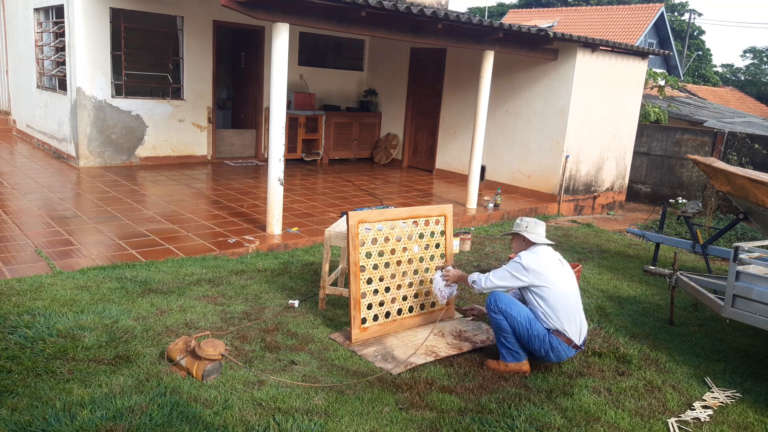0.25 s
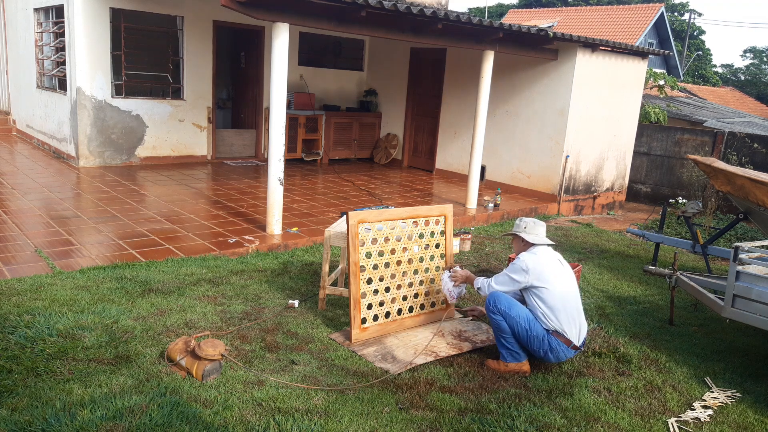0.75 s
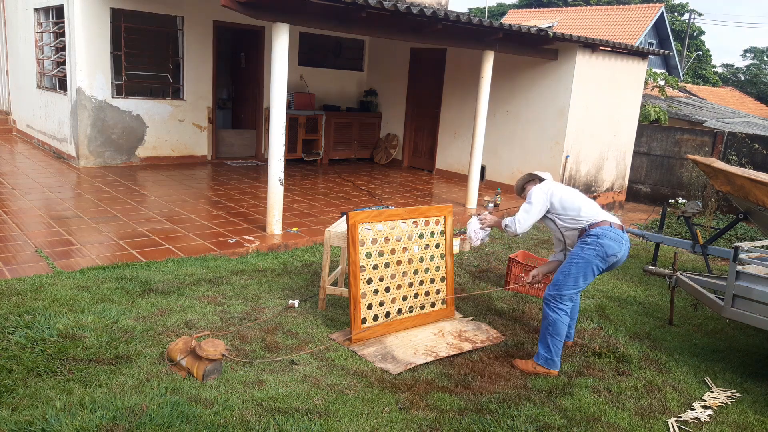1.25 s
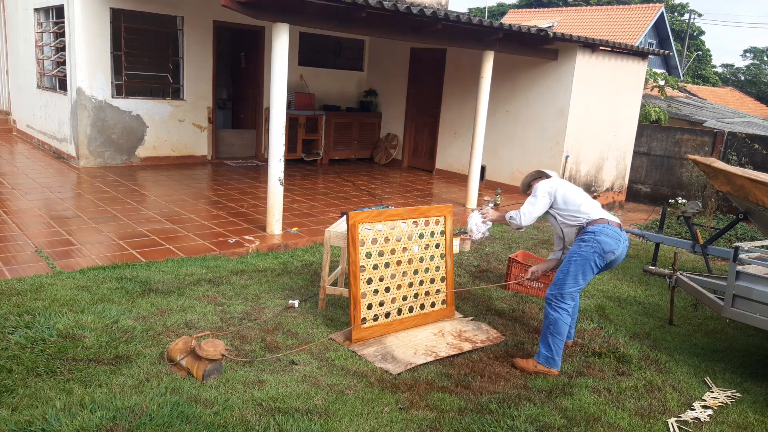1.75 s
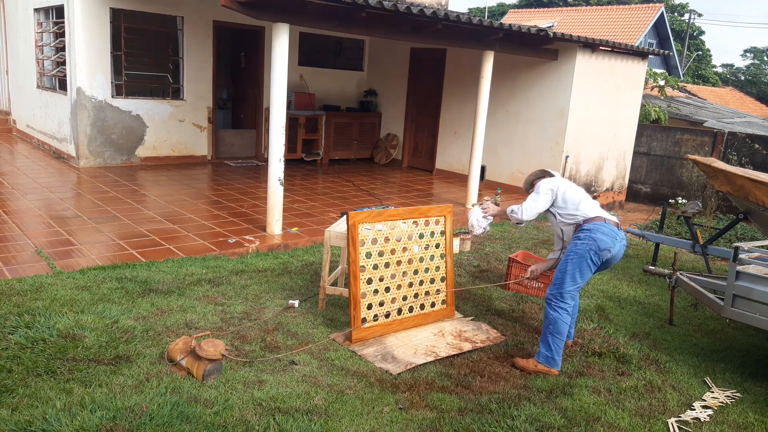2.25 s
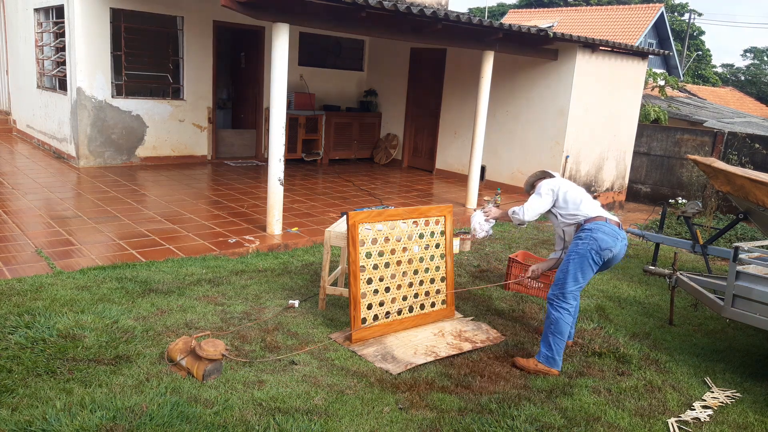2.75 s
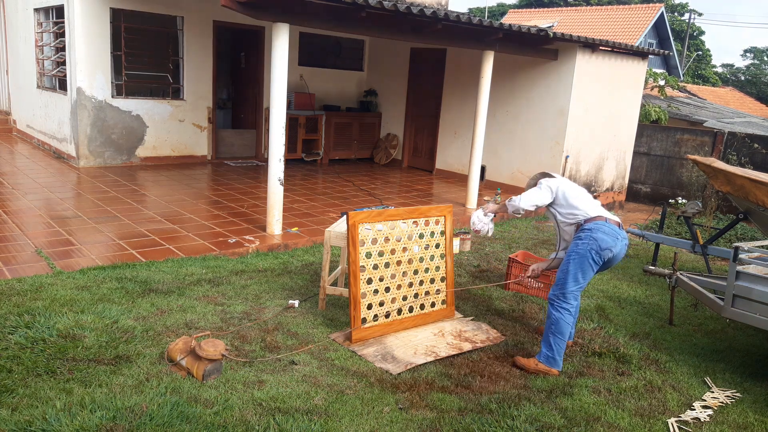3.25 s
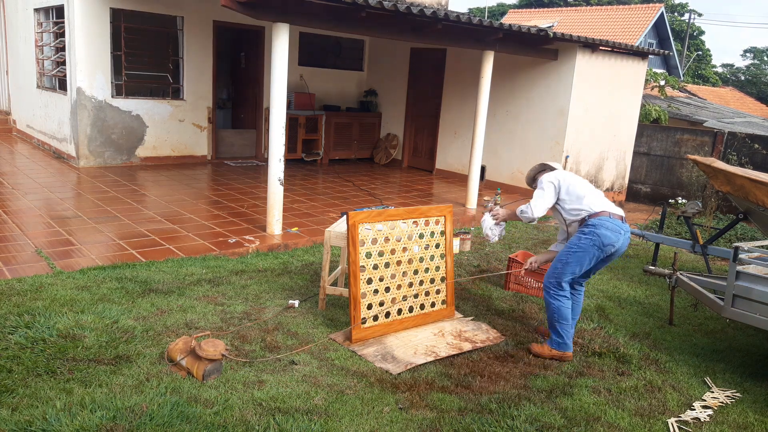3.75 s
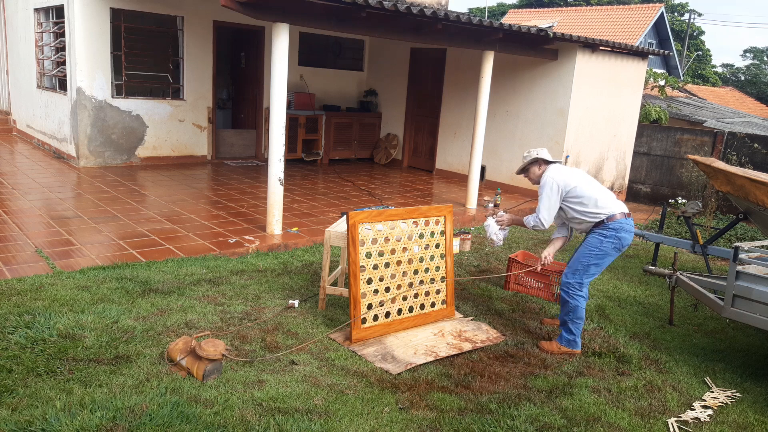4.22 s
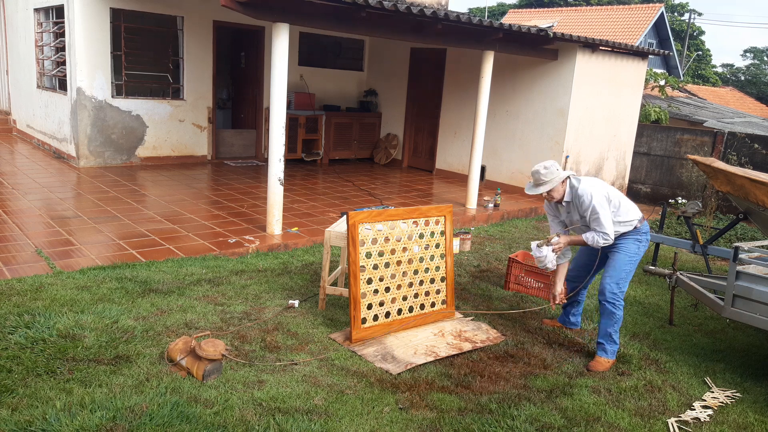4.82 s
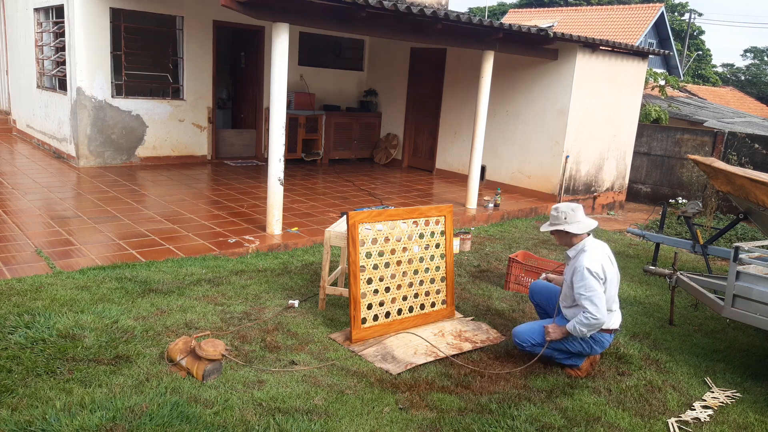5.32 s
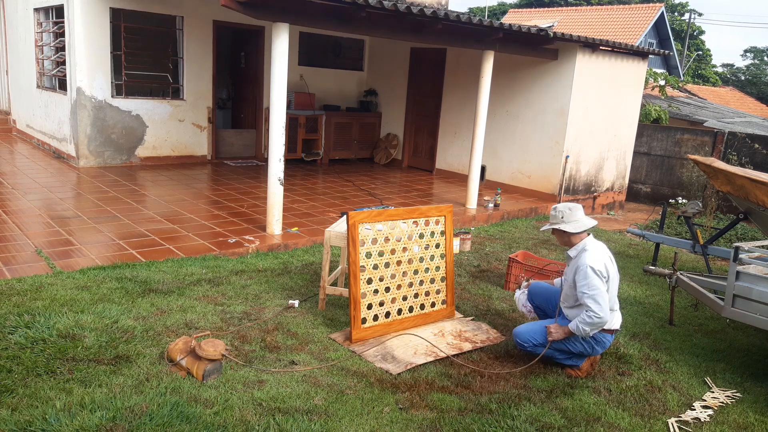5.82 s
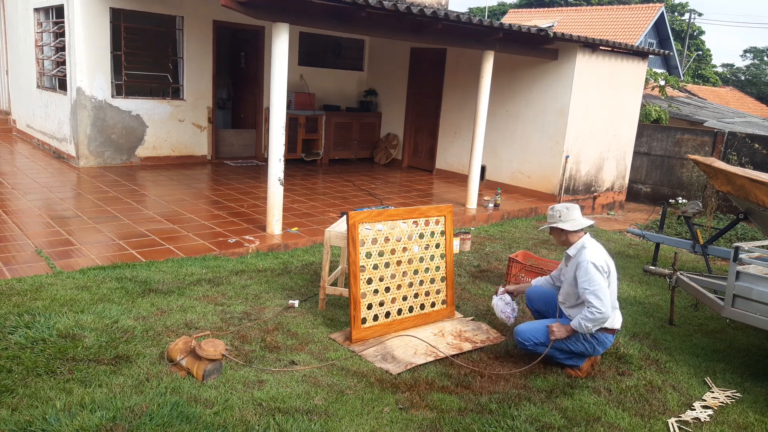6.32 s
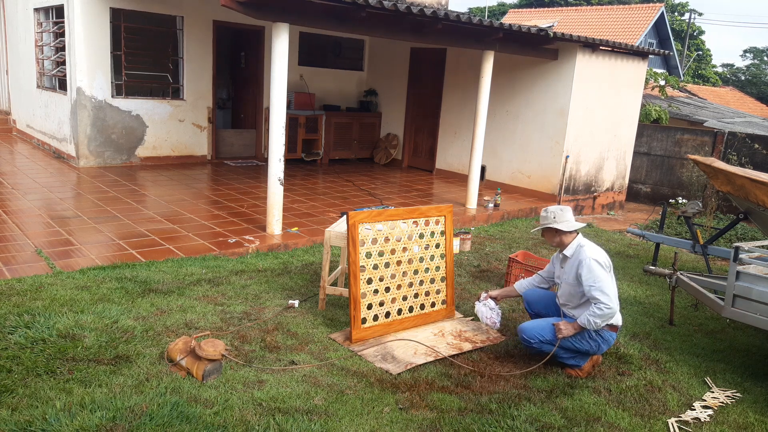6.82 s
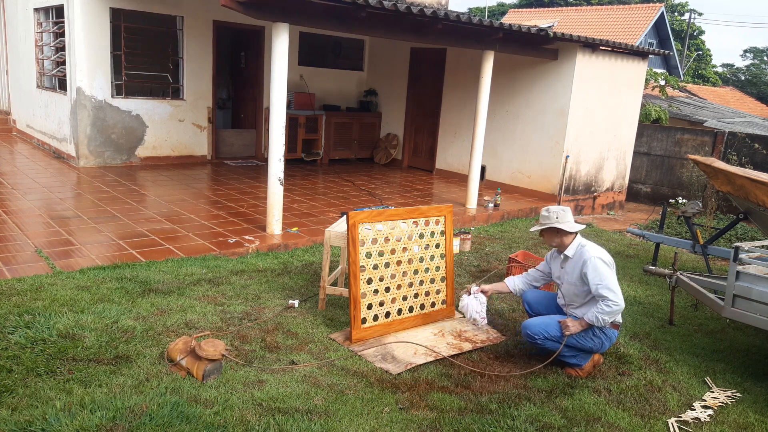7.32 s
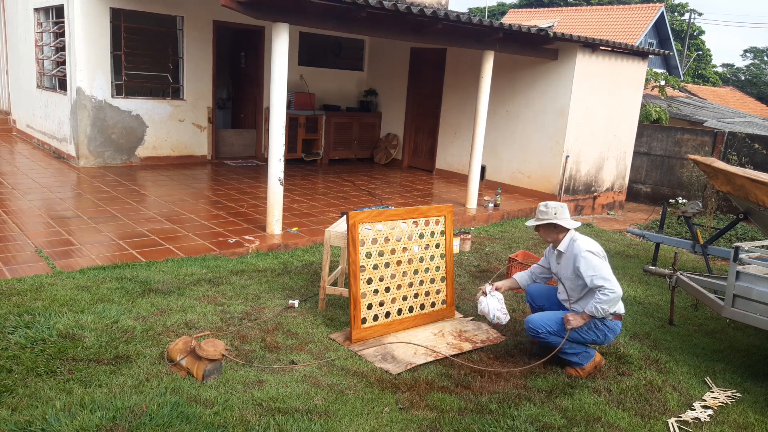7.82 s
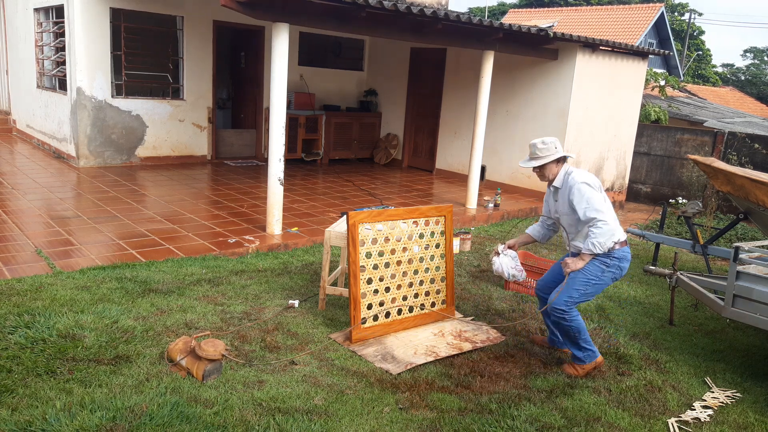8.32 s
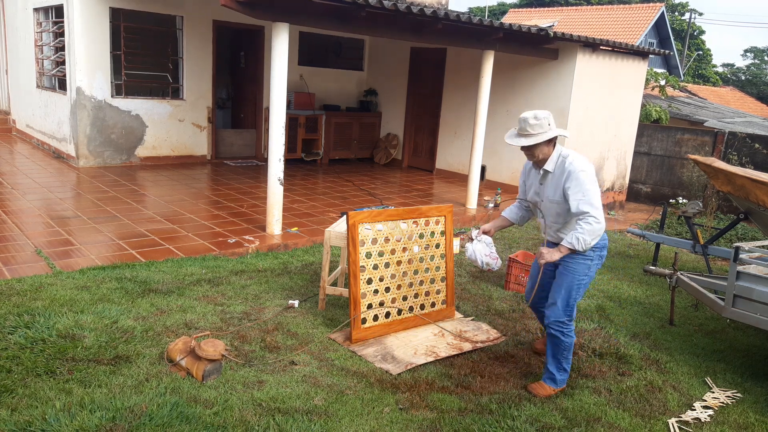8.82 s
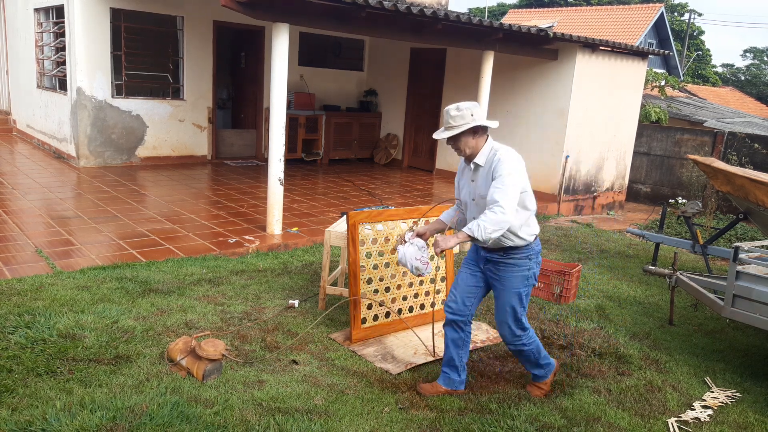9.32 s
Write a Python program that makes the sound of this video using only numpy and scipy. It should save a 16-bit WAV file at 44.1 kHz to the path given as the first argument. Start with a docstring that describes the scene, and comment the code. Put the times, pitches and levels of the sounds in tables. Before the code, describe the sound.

A low, rattling motor drone of about twenty-nine pulses a second runs throughout, with fine airy valve puffs and soft yard noise. Over it, a paint sprayer makes crisp, high hiss in short wrist-swing swells. The hiss cuts to a denser rush, softens, comes back, then stops abruptly, leaving the compressor alone before a final long spray with hollow, shifting colour that recedes. Open-air stereo pickup.

```python
"""A piston compressor chugs on a lawn by a house while a spray gun coats a wooden lattice panel.
First the gun hisses up close, swelling three times. At 0.98 s hiss and chug change abruptly: the hiss is
strong, eases off and returns. At 4.88 s they change again: the gun rests while the compressor chugs on,
then makes one long close pass and is drawn away. The chug is one shaft turn repeated, with puffs of shaped
noise at the valves. The hiss is three coloured noises combed by the panel's echo, which gives a moving,
phasing colour. Steady noise makes the yard."""
import sys
import numpy as np
from scipy import signal
from scipy.fft import rfft, irfft
from scipy.io import wavfile
from scipy.ndimage import uniform_filter1d

SR = 44100
rng = np.random.default_rng(int(sys.argv[2]) if len(sys.argv) > 2 else 0)


def unload_audio(sound):
    """Save the sound as a 16-bit wav file, at the path given as the first command line argument."""
    columns = np.transpose(np.atleast_2d(sound))
    # keep every value between -1 and 1, then stretch to whole-number steps
    steps = np.round(np.clip(columns, -1, 1) * 32767)
    wavfile.write(sys.argv[1], SR, steps.astype(np.int16))


N = 421596  # length in samples, about 9.6 s

SHAFT_HZ = 28.7125  # turns of the compressor's shaft per second
# The three stretches of the sound. Each row: start in seconds, lag of the crank in turns.
STRETCH_STARTS = [(0, .225), (.98, .147), (4.88, 0)]


def gain_of(db):
    """Turn decibels into an amplitude factor."""
    return 10 ** (np.asarray(db) / 20)


def read(points, hz):
    """Read a spectrum whose points are joined by straight lines over log frequency."""
    f, value = np.transpose(points)
    return np.interp(np.log(hz + 1), np.log(f + 1), value)


def follow(rows, t):
    """Read every column of a table at t, its first column being the position."""
    position, *columns = np.transpose(rows)
    return [np.interp(t, position, column) for column in columns]


def stretch_at(t):
    """Number of the stretch that each time belongs to."""
    return np.searchsorted(np.transpose(STRETCH_STARTS)[0], t, "right") - 1


def by_stretch(curves, t):
    """Read every column at the times t, each stretch following its own curve."""
    return np.choose(stretch_at(t), [np.array(follow(rows, t)) for rows in curves])


def drift(hz):
    """Random wandering of unit size, with nothing faster than hz."""
    spectrum = rfft(rng.standard_normal(N))
    slow = irfft(spectrum * (np.fft.rfftfreq(N, 1 / SR) < hz), N)
    return slow / slow.std()


def white(size):
    """Short-time spectra of two unrelated noises of 0 dB per Hz: (Hz, seconds, spectra)."""
    noise = rng.standard_normal((2, N)) * np.sqrt(SR / 2)
    return signal.stft(noise, SR, nperseg=size, noverlap=size - size // 4)


def ports(z, same, left_db, lead):
    """Two noises as left and right microphone ports hear them: partly alike, shifted in level and time."""
    same = np.clip(same, 0, 1)
    left = z[0] * lead * gain_of(left_db / 2)
    right = (same * z[0] + np.sqrt(1 - same ** 2) * z[1]) * gain_of(-left_db / 2)
    return np.array([left, right])


def sound(z):
    """Turn short-time spectra back into a waveform."""
    size = 2 * (z.shape[1] - 1)
    return signal.istft(z, nperseg=size, noverlap=size - size // 4)[1][:, :N]


def toward(hz, lead_ms=0.18):
    """Phase turn that lets a sound reach the left port first."""
    return np.exp(2j * np.pi * hz * lead_ms / 1000)


def crank():
    """Turns of the shaft so far: a steady speed, slightly uneven, with its own lag in each stretch."""
    t = np.arange(N) / SR
    lag = np.transpose(STRETCH_STARTS)[1]
    wobble = .0005 * drift(10)  # in turns
    return SHAFT_HZ * t - lag[stretch_at(t)] + wobble


def compressor(turns, scatter=0.33, count=90, size=4096):
    """Piston and valve knocks time the shaft's harmonics; housing and walls set how strong each one is."""
    # Pressure swells in each turn. Each row: place in the turn (0-1), ring in Hz, width in Hz,
    # weight in dB against the other knocks, direction (1 push, -1 suck).
    knock_rows = [(0.316, 660, 302, -4.5, 1), (0.523, 350, 252, 0, 1), (0.597, 361, 172, 3, 1),
                  (0.629, 412, 250, -13.5, -1), (0.785, 560, 378, -7.5, 1), (0.844, 770, 316, 0, -1),
                  (0.867, 424, 380, -8, 1), (0.942, 108, 127, 9, -1), (0.022, 412, 340, 1, -1),
                  (0.071, 218, 257, 5, 1), (0.104, 755, 285, -11, -1)]
    # Strength of the shaft's harmonics as housing and wall echoes pass them.
    # Each row: multiple of the shaft speed, relative level in dB, left minus right in dB.
    hum = [(1, -36.0, 0), (2, -12.5, -3), (3, -14.0, -4), (4, -5.0, -3), (5, -20.0, -3), (6, -7.0, -3),
           (7, -22.0, -3), (8, -13.0, -3), (9, -10.5, -4), (10, -2.5, 0), (11, 0.0, -3), (12, -8.0, 2),
           (13, -12.5, -6), (14, -23.5, -3), (15, -3.0, -4), (16, -13.5, -1), (17, -11.0, -1),
           (18, -19.5, -8), (19, -20.0, -3), (20, -31.0, -2), (21, -11.0, -6), (22, -16.5, -5),
           (23, -7.0, -1), (24, -7.0, -6), (25, -15.0, 7), (26, -22.0, -5), (27, -12.0, -2), (28, -9.5, -4),
           (29, -11.5, -3), (30, -24.5, 1), (31, -19.0, -5), (32, -19.0, -12), (33, -19.5, -3),
           (34, -18.5, 5), (35, -21.0, -2), (36, -27.0, -5), (37, -29.0, 9), (38, -21.5, 5),
           (39, -26.0, -8), (40, -31.0, 1), (41, -35.0, -6), (42, -28.0, 2), (43, -35.5, 5),
           (44, -30.0, -7), (45, -26.5, -4), (46, -29.0, -1)]
    # Faint buzz of the housing above those harmonics. Each row: frequency in Hz, relative level in dB.
    buzz = [(1350, -37), (1500, -53), (1610, -29), (1780, -82), (1910, -28.5), (2100, -49), (2600, -37)]
    # Loudness, with a brief dip at the second abrupt change. Each row: time in seconds, level in dB.
    load = [(0, -31.5), (4.86, -31), (4.88, -35), (4.9, -30), (6, -28.6), (7.5, -30), (8.6, -29.5),
            (9.5, -27.5)]
    order = np.arange(1, count + 1)
    hz = order * SHAFT_HZ
    knocks = 0
    for place, ring, width, db, way in knock_rows:
        response = 1 / (1 + ((hz - ring) / width) ** 2 / 2) ** 2
        knocks = knocks + np.sign(way) * gain_of(db) * np.exp(-2j * np.pi * order * place) * response
    hum_db, left_db = follow(hum, order)
    strength = gain_of(np.where(order <= len(hum), hum_db, read(buzz, hz)))
    # only the timing of the knocks is kept, not their strength
    harmonics = strength * knocks / abs(knocks)
    # the sound reaches the left port first; wall echoes stir the timing of the higher harmonics
    stir = scatter * np.minimum(hz / 800, 2) * rng.standard_normal(count) / 2
    apart = toward(np.minimum(hz, 1300) / 2) * np.exp(1j * stir) * gain_of(left_db / 2)
    pair = harmonics * np.array([apart, 1 / apart]) / np.maximum(abs(apart + 1 / apart), 1)
    # one turn as a waveform, its left-right mean scaled to unit size
    cycle = irfft(np.pad(pair, ((0, 0), (1, 0))), size)
    cycle /= cycle.mean(0).std()
    place_in_cycle = np.arange(size) / size
    chug = np.array([np.interp(turns, place_in_cycle, side, period=1) for side in cycle])
    flutter_db = .2 * drift(20)
    return chug * gain_of(follow(load, np.arange(N) / SR)[0] + flutter_db)


def valves(turns):
    """Short puffs of air at fixed places in each turn, and a thin steady whistle of the airflow."""
    # Puffs at the valves. Each row: place in the turn (0-1), spread in turns, gain in dB.
    puffs = [(.03, .014, 6), (.08, .028, 0), (.2, .015, -3), (.245, .012, -3), (.42, .022, -4),
             (.85, .08, -13)]
    # Colour of the air before the puffs' gain. Each row: frequency in Hz, level in dB per Hz.
    air_colour = [(600, -97), (1500, -85), (2700, -89), (3400, -87), (4200, -79), (5300, -80), (6300, -79),
                  (8000, -88), (16000, -96)]
    whistle_hz, whistle_width_hz, whistle_gain_db = 5020, 40, 5
    hz, t, z = white(size=512)
    hz = hz[:, None]
    pair = ports(z, same=0.088, left_db=-4.0, lead=toward(np.minimum(hz, 600)))
    air = sound(pair * gain_of(read(air_colour, hz)))
    power = 0
    for place, spread, db in puffs:
        distance = (turns - place + .5) % 1 - .5  # in turns, the short way round
        power = power + gain_of(db) ** 2 * np.exp(-(distance / spread) ** 2)
    # the whistle is a narrow band of the same air
    whistle = signal.lfilter(*signal.iirpeak(whistle_hz, whistle_hz / whistle_width_hz, SR), air)
    return air * np.sqrt(power) + gain_of(whistle_gain_db) * whistle


def spray_gun(same=0.52, patchy_db=1.8, sputter_db=0.26, mirror_hz=2500):
    """Nozzle fizz, the jet's rush on the wood and a hollow roar, all combed by the panel's echo."""
    # Slow course of the jet, one curve per stretch. Each row: time in seconds, nozzle fizz in dB,
    # rush and roar together in dB, roar against rush in dB, lag of the left port in ms.
    jet = [
        [(0, -32.5, -38, -6, .002)],
        [(1, -37, -34, -9.5, .025), (3.19, -36, -34, -11, .028), (3.26, -35.5, -39, -7.5, 0.03),
         (4.3, -35.5, -39, -6.5, 0.033), (4.48, -31, -34, -14, 0.016), (4.87, -36, -41.5, -8, 0.014)],
        [(5.48, -47, -61, -12, .002), (5.7, -40, -46.5, -10, .002), (5.9, -37, -42.5, -4, .002),
         (5.97, -27.5, -35.5, 0.5, .002), (6.5, -30.5, -35.5, 1, .002), (7.2, -28.5, -37.5, -3, .002),
         (7.34, -36, -35, -5, .002), (7.39, -35.5, -44, -12, 0.048), (8.55, -42, -47.5, -5, 0.038),
         (9.5, -44, -48, -6, .013)],
    ]
    # Echo between gun and panel as the hand moves, one curve per stretch.
    # Each row: time in seconds, delay in ms, strength in the treble (0-1).
    panel_echo = [
        [(0, .755, 0.2), (.6, 0.7, 0.2), (.97, 0.657, 0.4)],
        [(4.4, 1.2, .03), (4.6, 1, .33), (4.87, 0.87, .36)],
        [(5.6, .37, 0.1), (5.82, 0.24, .3), (6.02, 0.16, 0.4), (6.5, 0.17, 0.47), (6.88, 0.13, 0.35),
         (7.2, 0.18, 0.44), (7.5, 0.37, 0), (7.72, .29, .32), (7.9, .24, .32), (8.2, .36, 0)],
    ]
    # Colours of the three noises. Each row: frequency in Hz, relative level in dB.
    # The fizz is then moved in pitch and narrowed.
    fizz_colour = [(5000, -52), (8200, -8.5), (9300, -7), (10500, -4), (11500, -1.5), (12600, 0),
                   (14200, -1), (16000, -4)]
    rush_colour = [(900, -6.5), (2000, -8.5), (2900, -3.5), (3700, -5.5), (4300, -2.5), (5500, 1),
                   (6400, 2), (7300, 3), (7950, 4), (8400, 0.5), (10000, -6.5), (14000, -33)]
    roar_colour = [(500, -24), (1150, -9), (1500, 0.5), (2000, 0.5), (2500, -9), (4500, 0), (6300, -18),
                   (6800, -1.5), (7100, 5.5), (7500, -2), (8000, -29), (12000, -40)]
    # The fizz sounds higher or lower as the jet turns on the wood. Each row: time in seconds, pitch factor.
    fizz_pitch = [(.9, 0.97), (1.1, 0.98), (6.05, .96), (6.5, .99), (6.7, 0.96), (7, 1.01), (7.25, 0.97),
                  (7.55, 0.96), (7.85, 0.99), (8.1, 0.9), (8.5, 1.05), (9.5, 0.96)]
    # Balance of the gun. Each row: frequency in Hz, left minus right in dB.
    gun_side = [(1300, -5), (4400, -1.5), (7200, -4.5), (8300, 2.5), (9500, 4), (12000, -1), (16000, 0.5)]
    fizz_narrowing = 1  # how much the fizz gathers around its peak as the roar takes over
    hz, t, z = white(size=512)
    hz = hz[:, None]
    fizz_db, rush_db, roar_db, lag_ms = by_stretch(jet, t)
    fizz_db, rush_db = swings(t) + [fizz_db, rush_db]
    delay_ms, echo = by_stretch(panel_echo, t)
    phase_per_ms = -2j * np.pi * hz / 1000
    # sound bounces to and fro; the narrow slats mirror mostly the treble
    bounce = echo * hz / (hz + mirror_hz)
    comb = 1 / abs(1 - bounce * np.exp(phase_per_ms * delay_ms)) ** 2
    late = np.exp(phase_per_ms * lag_ms)
    common = (1 + same * late.real) / 2  # share of the power common to both ports
    # rush and roar share the jet's power
    plain_db = rush_db - 10 * np.log10(1 + gain_of(roar_db) ** 2)
    roar_share = 1 - gain_of(plain_db - rush_db) ** 2
    pitched_fizz_db = read(fizz_colour, hz / follow(fizz_pitch, t)[0])
    layers = [(pitched_fizz_db * (1 + fizz_narrowing * roar_share), fizz_db),
              (read(rush_colour, hz), plain_db),
              (read(roar_colour, hz), plain_db + roar_db)]
    power = 0
    for colour_db, level_db in layers:
        shape = gain_of(colour_db) ** 2 * comb
        # scaled so that colour and echo leave the level alone
        power = power + gain_of(level_db) ** 2 * shape / ((shape * common).sum(0) * hz[1])
    # turbulence: patches in time and frequency, and a fine sputter of the liquid
    patches = uniform_filter1d(rng.standard_normal(power.shape), size=5, axis=0)
    patches = uniform_filter1d(patches, size=20, axis=1)
    turbulence = gain_of(patchy_db * patches / patches.std())
    pair = ports(z, same, read(gun_side, hz), late) * np.sqrt(power) * turbulence
    return sound(pair) * gain_of(sputter_db * drift(150))


def swings(t):
    """Wrist swings turn fizz or rush towards the listener and back: rounded swells or dips in dB."""
    # Each row: middle in seconds, length at half height in seconds, change of fizz in dB, change of rush in dB.
    swing_rows = [(.23, .22, 3.5, 0.5), (0.49, 0.099, 4.5, 0), (.82, .19, 4.5, 0), (1.2, 0.21, 4, -2),
                  (1.42, .18, -1, 1.5), (1.72, .34, 5, -3), (2.203, .13, 5.5, 0), (2.32, 0.18, -1, -4),
                  (2.537, 0.28, 4.5, -1.5), (2.792, 0.22, 5, -2.5), (3.09, 0.2, 4, 0), (3.55, .2, 0.5, 0),
                  (3.708, .1, -1.5, -3), (3.87, 0.2, 1.5, 2), (4.727, .22, 4, 2.5), (6.057, .16, 1, -2),
                  (6.457, 0.27, 2.5, -4), (7.123, 0.11, 0.5, 1), (8.83, .1, 3, 1.5), (9.2, 0.41, 4, 3)]
    edge = 3.5  # steepness of a swing's start and end: 2 is a bell, higher is flat-topped
    total = 0
    for middle, length, fizz_db, rush_db in swing_rows:
        swell = .5 ** abs(2 * (t - middle) / length) ** edge
        total = total + np.outer([fizz_db, rush_db], swell)
    return total


def yard():
    """Steady rush of the motor's fan and the open air: noise with a fixed colour."""
    # Each row: frequency in Hz, level in dB per Hz.
    yard_colour = [(20, -85), (65, -69), (130, -72), (200, -73), (320, -68.5), (440, -67.5), (540, -73),
                   (720, -68), (1250, -80), (2500, -80), (5300, -84), (8600, -85.5), (12000, -86),
                   (16000, -81)]
    hz, t, z = white(size=2048)
    hz = hz[:, None]
    pair = ports(z, same=0.59, left_db=-0.5, lead=toward(hz))
    return sound(pair * gain_of(read(yard_colour, hz)))


def scene():
    """Compressor with its valves, spray gun and yard together."""
    turns = crank()
    return compressor(turns) + valves(turns) + yard() + spray_gun()


def record(dry):
    """The recorder's band limit: a steep filter takes away the highest treble."""
    edge_hz = 15850
    lowpass = signal.firwin(511, edge_hz, window=("kaiser", 9), fs=SR)
    return signal.oaconvolve(dry, lowpass[None], "same")


dry = scene()
out = record(dry)
unload_audio(out)
```